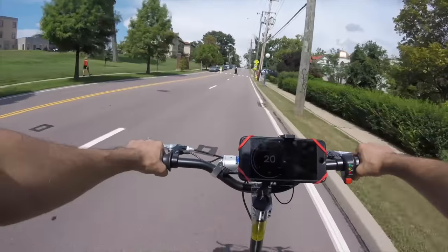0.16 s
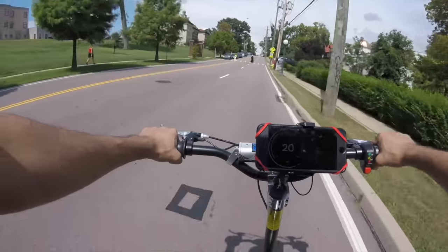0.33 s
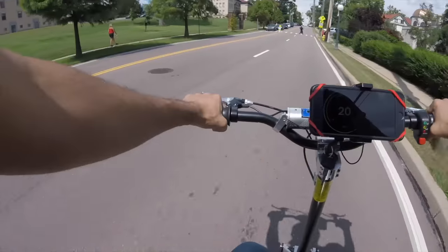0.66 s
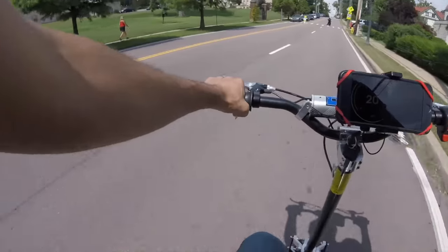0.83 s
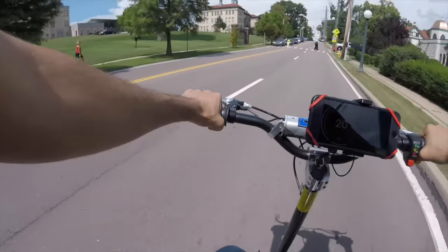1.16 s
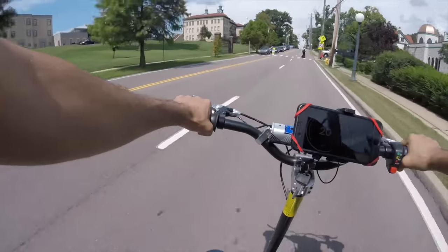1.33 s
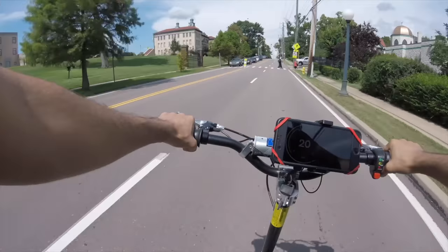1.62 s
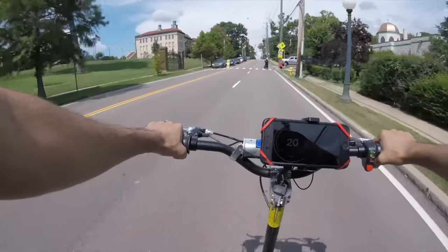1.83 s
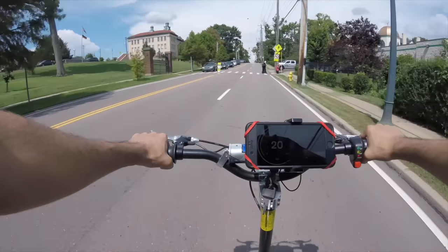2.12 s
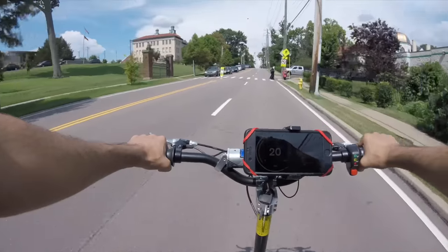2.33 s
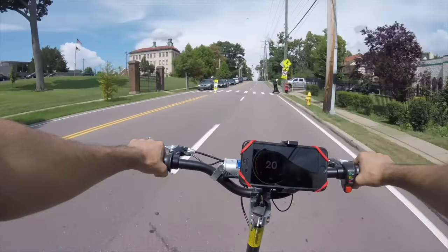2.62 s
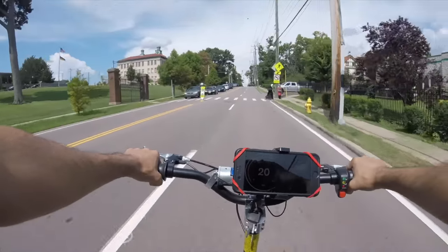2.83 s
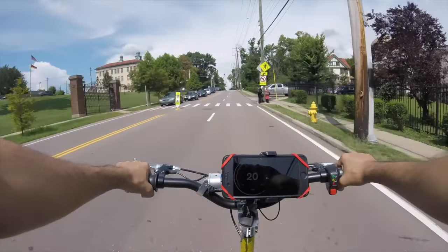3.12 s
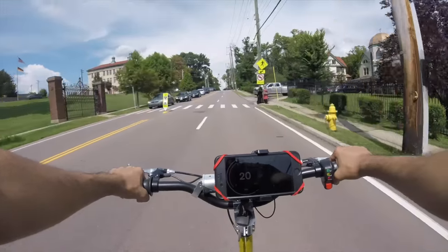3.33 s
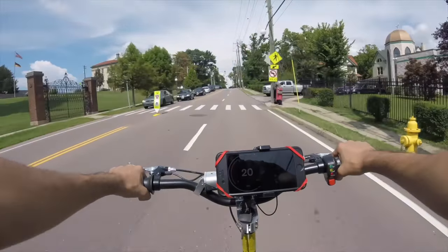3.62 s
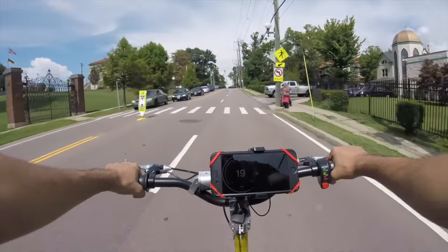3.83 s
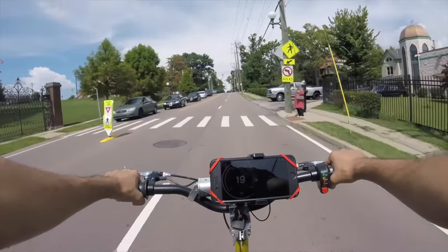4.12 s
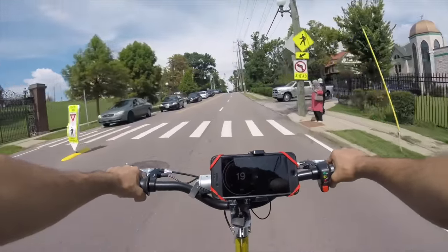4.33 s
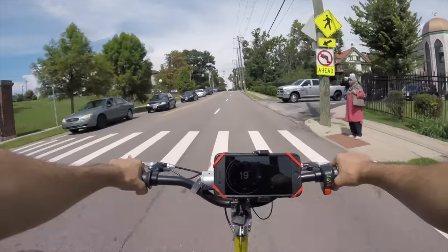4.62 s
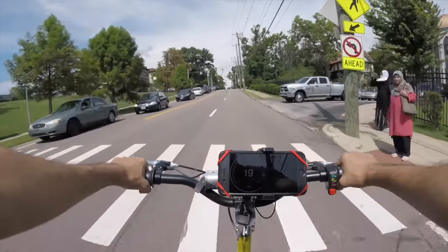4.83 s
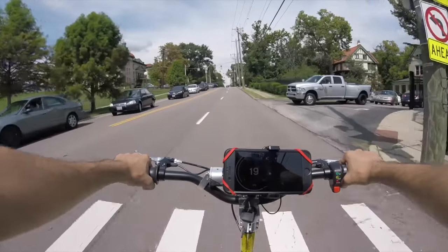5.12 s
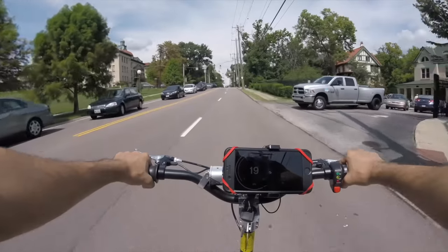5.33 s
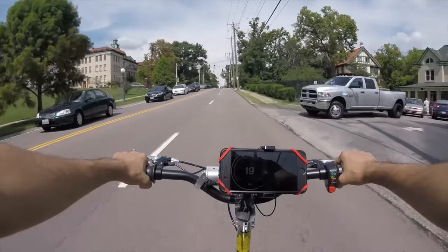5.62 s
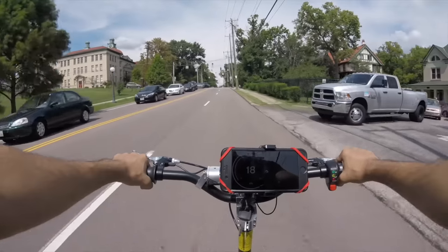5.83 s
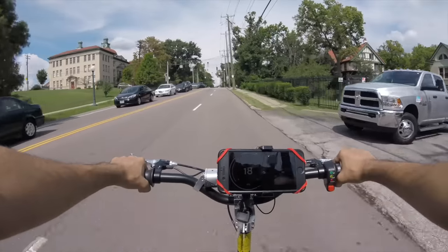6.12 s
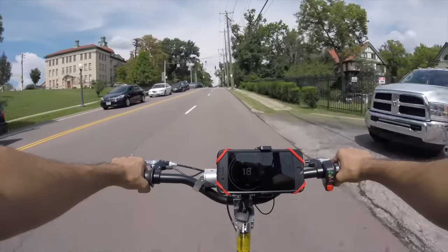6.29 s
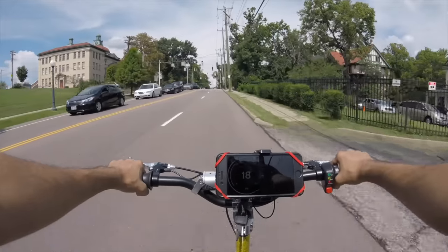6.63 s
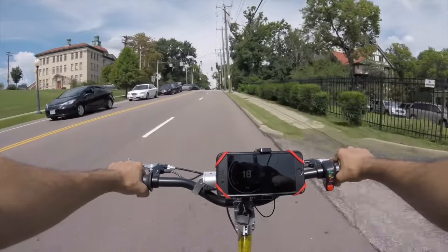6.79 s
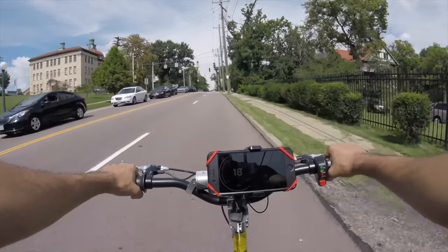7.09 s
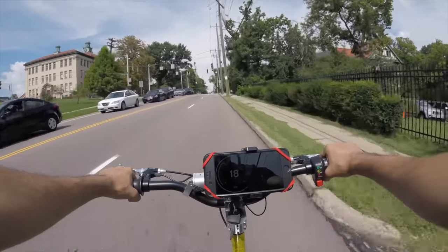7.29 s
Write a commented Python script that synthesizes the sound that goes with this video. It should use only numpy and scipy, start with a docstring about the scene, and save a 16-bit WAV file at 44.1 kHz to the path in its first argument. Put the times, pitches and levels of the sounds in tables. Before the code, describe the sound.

Close on a moving electric scooter: throbbing mid-pitched motor whine, gritty rolling tyres and hiss, with lumpy low wind buffets bursting throughout.

```python
"""On a road, at the chest of the rider: an electric scooter rolls and slowly loses speed.
The hub motor whines 55 times a wheel turn and throbs with the turn, as a sum of sines locked to it.
Tyres roar and hiss as coloured noise through the resonances of the frame; a low hum drifts by itself.
The head wind rumbles on the microphone port and breaks into buffets; a handlebar part squeaks."""
import sys
import numpy as np
from scipy import signal
from scipy.fft import rfft, irfft, next_fast_len
from scipy.io import wavfile
from scipy.ndimage import uniform_filter1d

SR = 44100
rng = np.random.default_rng(int(sys.argv[2]) if len(sys.argv) > 2 else 0)


def invert_db(level):
    """Linear amplitude ratio for a level in decibels (20 dB per decade), elementwise."""
    return 10 ** (np.asarray(level, dtype=float) / 20)


def log_audio(samples):
    """Write samples as a 16-bit WAV file to the path given in sys.argv[1]."""
    # one column per channel
    frames = np.atleast_2d(samples).T
    # limit to full scale, then quantise
    limited = np.clip(frames, -1, 1)
    pcm = np.round(limited * 32767).astype(np.int16)
    wavfile.write(sys.argv[1], SR, pcm)


N = 328646


def rms_one(x):
    """Normalisation: scale a signal to unit root mean square."""
    return x / np.sqrt(np.mean(x ** 2) + 1e-20)


def in_time(rows):
    """Linear interpolation: each column of a time table, sample by sample."""
    s, *columns = np.transpose(rows)
    return [np.interp(np.arange(N) / SR, s, column) for column in columns]


def drift(rate_hz):
    """Low-pass random process: noise at every 40th sample through two equal one-poles; unit rms."""
    pole = np.exp(-2 * np.pi * rate_hz * 40 / SR)
    white = rng.standard_normal(N // 40 + 2002)
    slow = signal.lfilter([1], [1, -2 * pole, pole * pole], white)[2000:]  # settled part only
    return np.interp(np.arange(N) / 40, np.arange(len(slow)), rms_one(slow))


def frame_db(hz):
    """Resonance: bell-shaped lifts in dB, summed over the modes of frame and housing."""
    # modes of frame and housing: (centre [Hz], width [Hz], lift [dB])
    modes = [(1038, 300, 1.5), (1294, 45, -1.5), (1923, 30, 3.5), (2050, 100, 3.5), (2440, 230, 3),
             (2874, 170, 6.5), (3206, 77, 6.5), (3400, 58, 2), (4470, 50, 3.5), (5064, 460, 9.5),
             (6260, 290, 5.5), (6620, 380, 5.5), (9070, 510, 4), (10930, 1500, 11.5), (13000, 600, 6.5)]
    return sum(db / (1 + (2 * (hz - centre) / width) ** 2) for centre, width, db in modes)


def noise(spectrum, patchy_db, flicker_hz, through_frame=False):
    """Spectral shaping: noise in octave bands that flicker together and each alone; unit rms."""
    size = next_fast_len(N)
    hz = np.arange(size // 2 + 1) * SR / size + 1
    points_hz, points_db = np.transpose(spectrum)
    shape_db = np.interp(np.log(hz), np.log(points_hz), points_db, left=-120, right=-120)
    if through_frame:
        shape_db = shape_db + frame_db(hz)
    bins = rfft(rng.standard_normal(size)) * invert_db(shape_db)
    octave = np.floor(np.log2(hz / points_hz[0]))
    together = drift(flicker_hz)
    out = np.zeros(N)
    for k in range(int(np.log2(points_hz[-1] / points_hz[0])) + 1):
        band = irfft(bins * (octave == k), size)[:N]
        out += band * invert_db(patchy_db * (together + drift(flicker_hz)))
    return rms_one(out)


def evened(x, size, floor):
    """Level compression: divide noise by the root of its running power plus a floor; unit rms."""
    return rms_one(x / np.sqrt(uniform_filter1d(x ** 2, size=size) + floor))


def swells(times, levels_db, half_lengths, rise, flat=1):
    """Amplitude envelope: a smooth hump for each event; flat below 1 squares it off."""
    out = np.zeros(N)
    for s, db, half in zip(times, levels_db, half_lengths):
        hump = np.hanning(int(max(half, .004) * 2 * SR)) ** flat
        i = max(int((s - rise * half) * SR), 0)  # rise: share of the half length ahead of the time
        out[i:i + len(hump)] += invert_db(db) * hump[:N - i]
    return out


def motor():
    """Periodic force: magnet pulls whine; an uneven wheel adds other multiples of its turn."""
    # speed of the wheel as pitch of the whine: (time [s], frequency [Hz])
    speed = [(0, 646.8), (0.3, 646.8), (0.5, 648.8), (0.75, 646.2), (1, 640.5), (1.7, 635.8), (2.1, 636.8),
             (2.4, 634.8), (3, 625.5), (3.3, 622.2), (3.6, 621.5), (3.9, 615.2), (4.5, 610.2), (4.8, 603.5),
             (5.4, 603.2), (5.85, 596.2), (6.9, 597), (7.2, 593.5), (7.45, 593.5)]
    # strength of the motor sound: (time [s], whine level [dB])
    whine_levels = [(0, -25.5), (.3, -24.5), (.58, -20.5), (.8, -21.5), (1, -19.5), (1.25, -20.5),
                    (1.7, -20), (2.1, -22), (2.9, -22), (3.25, -22), (3.9, -25), (4.4, -25), (4.9, -27),
                    (5.5, -23.5), (5.9, -28), (6.3, -28), (6.9, -26.5), (7.45, -26.5)]
    # lines of the wheel; neighbours of 55 make the throb, its multiples are overtones: (rate [per turn])
    per_turn = [31.7, 32.6, 50, 53, 54, 56, 57, 60, 65, 70, 75, 82.5, 99, 100, 108, 109, 110, 115, 165, 220,
                255, 270, 275, 330, 385, 440]
    # the lines against the whine, before frame lift and wander:
    # (level when fast [dB], level half slowed [dB], level when slow [dB])
    line_levels = [(-30, -27.5, -17.5), (-18, -18, -20), (-24, -40, -30), (-28, -37, -59), (-50, -43, -14),
                   (-26, -14, -47), (-27, -17, -13), (-23, -27, -23), (-23, -24, -55), (-24, -58, -42),
                   (-20, -23, -52), (-25, -38, -27), (-48, -41, -15), (-40.5, -20, -20), (-52, -23, -20.5),
                   (-22, -42, -31), (-18, -21.5, -15.5), (-35, -38, -21.5), (-24, -22, -28),
                   (-41, -29, -20), (-34, -49, -57), (-40, -52, -55), (-34, -37, -42), (-34, -53, -31),
                   (-32, -40, -43), (-43, -38.5, -44)]
    pulls_per_turn = 55
    fast_hz, slow_hz = 650, 595
    frame_share = 1.23  # a line gets the frame's lift in dB times this
    overtone_wander_db, side_wander_db = 1.2, 3.0

    (hz,), (whine_db,) = in_time(speed), in_time(whine_levels)
    slowed = np.clip((fast_hz - hz) / (fast_hz - slow_hz), 0, 1)
    turn = 2 * np.pi * np.cumsum(hz + 1.34 * drift(35.0)) / SR / pulls_per_turn  # wheel angle [rad]
    out = invert_db(1.4 * drift(38.0)) * np.sin(pulls_per_turn * turn)
    for times, levels_db in zip(per_turn, line_levels):
        # a line swells or fades as the falling speed carries it across the frame resonances
        lift_db = frame_share * frame_db(times / pulls_per_turn * hz[::64])
        wander_db = side_wander_db if times % pulls_per_turn else overtone_wander_db
        level_db = np.interp(slowed[::64], [0, .5, 1], levels_db)
        level_db = level_db + lift_db + wander_db * drift(8.9)[::64]
        # road shake makes each line waver in phase, the higher the more
        waver = (.001 + (times / 11000) ** 2) * times * drift(25.0)
        out += invert_db(level_db).repeat(64)[:N] * np.sin(times * turn + waver)
    return np.sqrt(2) * invert_db(whine_db) * out, turn, slowed


def tyres(turn, slowed):
    """Forced vibration: road grain shakes tyre and frame into noise that beats a little with the turn."""
    # unevenness of the road, before each layer's weight:
    # (time [s], grain for roar and hiss [dB], middle band for drone and buzz [dB], ringing band [dB])
    road = [(0, -1, -2.5, 3), (.3, 0.5, -0.5, 2), (.6, 1, 2, 2), (.85, 2.5, 4.5, 4), (1.25, 1, 5.5, 6),
            (1.7, 2.5, 2, 2.5), (2.1, 2.5, 2, 7), (2.5, -0.5, 0.5, 3), (2.9, 2, 0.5, 8.5),
            (3.25, 2.5, 1, 3), (3.9, 1.4, -0.5, -1.5), (4.4, 0.5, 0, -4), (4.8, 1.5, 0, 0),
            (5.1, 2.7, 2, 6), (5.5, 4.5, 5.5, 7), (5.9, 0.8, 1.5, 3), (6.3, .5, 3.5, 1), (6.9, 3, 4.5, -3),
            (7.45, 2, 3.5, -2)]
    # relative spectra before the frame: (frequency [Hz], level [dB per Hz])
    roar_spectrum = [(150, -4), (250, -6), (500, -4.5), (900, -3.5), (1350, -7.5), (1600, -18.5),
                     (2000, -34)]
    drone_spectrum = [(1200, -16.5), (1500, 1), (2100, 2.5), (2500, -5), (3000, -16)]
    buzz_spectrum = [(2000, -38), (2600, -6.5), (3100, 2.5), (4000, -2), (4600, -3), (5100, -19)]
    ring_spectrum = [(4300, -34), (4800, 3), (5300, -1), (5800, -10)]
    hiss_spectrum = [(4500, -12.5), (5700, -5), (7000, -3.5), (7800, -7.5), (10000, -13), (11800, -19.5),
                     (13500, -21), (15000, -29)]

    grain_db, middle_db, ringing_db = in_time(road)
    # from fast to slow the roar grows, buzz and hiss fade
    roar_db = -31.5 + 0.97 * slowed + grain_db
    drone_db = -43 + middle_db
    buzz_db = -44 - 6.5 * slowed + 1.22 * middle_db
    ring_db = -52 + ringing_db
    hiss_db = -50 - 1.1 * slowed + 0.97 * grain_db + 0.45 * middle_db

    roar = invert_db(roar_db) * noise(roar_spectrum, patchy_db=0.7, flicker_hz=14.0, through_frame=True)
    drone = invert_db(drone_db) * noise(drone_spectrum, patchy_db=1.15, flicker_hz=75.0, through_frame=True)
    buzz = invert_db(buzz_db) * noise(buzz_spectrum, patchy_db=1.05, flicker_hz=30.0, through_frame=True)
    ring = invert_db(ring_db) * noise(ring_spectrum, patchy_db=1.5, flicker_hz=15.0, through_frame=True)
    hiss = invert_db(hiss_db) * noise(hiss_spectrum, patchy_db=0.82, flicker_hz=33.0, through_frame=True)
    beat_db = 0.22 * np.cos(2 * turn)  # twice a turn
    return invert_db(beat_db) * (roar + drone + buzz + ring + hiss)


def hum():
    """Frequency modulation: a low sine whose pitch and level waver slightly."""
    # drift of the tone: (time [s], frequency [Hz], level [dB])
    tone = [(0, 257.4, -41.5), (.6, 260.5, -33), (1.2, 261.4, -37.5), (2.2, 249.8, -41.5), (3, 250, -37.5),
            (3.8, 253.5, -70), (5, 256.7, -43), (5.6, 265.6, -42), (6.3, 269.5, -38), (7, 266, -34.5),
            (7.45, 262, -31.5)]
    hz, level_db = in_time(tone)
    phase = 2 * np.pi * np.cumsum(hz + 4.21 * drift(7.8)) / SR
    return np.sqrt(2) * invert_db(level_db + 1.76 * drift(13.5)) * np.sin(phase)


def wind():
    """Turbulence: lumpy rumble all along; each buffet is a short eddy, a thump with a bright edge."""
    # head wind between surges: (time [s], rumble level [dB])
    steady = [(0, -20.5), (.3, -20), (.7, -15), (1.25, -14.5), (1.4, -21.5), (2.2, -16.5), (2.6, -20.5),
              (3.1, -17), (3.4, -29), (4.5, -22), (4.9, -20), (5.5, -14.5), (5.7, -25.5), (6.4, -15.5),
              (6.6, -23.5), (7.15, -16), (7.45, -24)]
    # low surges of the head wind: (time [s], level [dB], half length [s])
    surges = [(0.122, -15.5, 0.073), (0.614, -20, 0.14), (0.876, -21, .05), (1.27, -19, 0.036),
              (1.475, -20, 0.14), (1.735, -10.5, .06), (1.945, -19, .1), (2.092, -14.5, 0.036),
              (2.25, -15.5, .09), (2.485, -15, 0.068), (2.91, -27, .14), (3.45, -16.5, .1),
              (3.609, -8.5, 0.05), (3.764, -14.5, 0.13), (3.917, -12.5, 0.064), (4.06, -15.5, .07),
              (4.262, -14.5, .1), (4.4, -9.5, 0.03), (4.491, -12.5, 0.035), (4.595, -12, 0.032),
              (4.795, -31, 0.099), (5.054, -20, 0.061), (5.553, -19, .08), (5.68, -11, 0.033),
              (5.798, -18.5, 0.11), (5.96, -13.5, 0.063), (6.113, -17, 0.085), (6.497, -31, 0.045),
              (6.72, -17.5, 0.12), (6.85, -21, .04), (6.937, -16, .045), (7.24, -20.5, 0.1),
              (7.393, -10.5, .065)]
    # buffets on the port, before the trims of level and length below:
    # (time [s], level [dB], bright edge against it [dB], half length [s])
    buffets = [(0.137, -9.5, -9.5, 0.023), (0.613, -11, -23, 0.015), (1.108, -9.5, -24, 0.0085),
               (1.216, -11.5, -13, 0.013), (1.288, -3.5, -13.5, 0.015), (1.721, -11, -0.5, 0.028),
               (1.772, -21, -6, 0.012), (1.934, -20, -17, 0.016), (2.196, -9.5, -22, 0.019),
               (2.272, -13, -9, 0.013), (2.368, -15, -30, 0.03), (2.422, -8.5, -14, 0.015),
               (2.524, -3.5, -25, 0.0076), (2.942, -11.5, -15, 0.03), (3.168, -12, -1, 0.02),
               (3.186, -17, -13, 0.012), (3.276, -7.5, -5.5, 0.018), (3.438, -12.5, -17, 0.017),
               (3.497, -15, 1, 0.014), (3.515, -5.5, -8, 0.018), (3.599, -6.5, -5, 0.014),
               (3.74, -17, -15, 0.017), (3.804, -12.5, -17, 0.008), (3.933, -20, -20, 0.014),
               (4.073, -14, -6, 0.018), (4.208, -30, -18, 0.028), (4.3, -30, -26, 0.0094),
               (4.394, -11.5, -8, 0.022), (4.594, -10, -9, 0.027), (4.829, -9.5, -9, 0.012),
               (5.455, -11.5, -12, 0.016), (5.559, -10.5, -7, 0.017), (5.597, -5.5, -12, 0.014),
               (5.675, -9.5, -15, 0.018), (5.938, -15, -25, 0.029), (5.97, -17.5, -3.5, 0.016),
               (6.167, -14.5, -20, 0.027), (6.365, -9.5, -20, 0.017), (6.495, -6, -10.5, 0.032),
               (6.568, -10.5, -20, 0.01), (6.735, -17, -16, 0.014), (6.952, -14, -24, 0.018),
               (7.258, -6.5, -11, 0.017), (7.392, -4, -14, 0.0074)]
    # relative spectra: (frequency [Hz], level [dB per Hz])
    rumble_spectrum = [(8, -5.5), (20, -2.5), (45, -1), (70, -7.5), (110, -10.5), (180, -21.5),
                       (300, -29.5), (600, -49)]
    thump_spectrum = [(25, -12), (60, 4), (120, -1.5), (200, -5), (350, -15), (600, -30.5), (1000, -56)]
    edge_spectrum = [(150, -13), (300, 1.5), (500, 1), (900, -9.5), (1500, -27), (2400, -44)]

    rumble = evened(noise(rumble_spectrum, patchy_db=1.5, flicker_hz=11.0), size=2500, floor=1.0)
    thump = evened(noise(thump_spectrum, patchy_db=0.74, flicker_hz=23.0), size=900, floor=0.038)
    edge = evened(noise(edge_spectrum, patchy_db=5.0, flicker_hz=96.0), size=400, floor=0.036)

    s, level_db, edge_db, half_length = np.transpose(buffets)
    thumps = swells(s, level_db + 0.32, half_length, rise=0.97) * thump
    bright = swells(s, level_db + edge_db, 0.73 * half_length, rise=0.99) * edge
    strength = invert_db(in_time(steady)[0]) + swells(*np.transpose(surges), rise=0.98)
    flow = strength * rumble + thumps
    # pressure grows with the square of the air speed: crests are sharper than troughs
    high_pass = signal.butter(2, 25, "high", fs=SR, output="sos")
    crests = signal.sosfilt(high_pass, flow ** 2)
    return flow + 0.3 * crests + bright


def ducking():
    """Exponential recovery: a gain that drops quickly at each listed time and creeps back."""
    # dips of motor and tyres: (time [s], gain change [dB])
    dips = np.array([(1.29, -2.5), (1.725, -2), (3.28, -2), (3.6, -2), (5.59, -2.5)])
    fall_s, recover_s = 0.005, 1.01
    since = np.maximum(np.arange(N) / SR - dips[:, :1], 0)
    shape = np.minimum(since / fall_s, 1) * np.exp(-since / recover_s)
    return invert_db(dips[:, 1] @ shape)


def squeaks():
    """Friction: short rubs of a handlebar part, noise in a narrow band with a scratchy halo around it."""
    # rubs: (time [s], level of band and of halo [dB], frequency [Hz], length before scaling [s])
    rubs = [(3.49, -45, 3600, .012), (3.54, -46, 3400, .012), (4.085, -50, 3520, .09)]
    white = rng.standard_normal(N)

    def band(hz, half_width_hz):
        """Band-pass filtering: noise on both sides of a centre frequency, at unit rms."""
        limits = [hz - half_width_hz, hz + half_width_hz]
        return rms_one(signal.sosfilt(signal.butter(2, limits, "band", fs=SR, output="sos"), white))

    out = np.zeros(N)
    for s, db, hz, length in rubs:
        envelope = swells([s], [db], [0.66 * length], rise=0.18, flat=0.2)
        out += envelope * (band(hz, 80) + band(hz, 700))
    return out


def scene():
    """Superposition: motor, tyres, hum, wind and squeaks add at one microphone."""
    whine, turn, slowed = motor()
    rolling = ducking() * (whine + tyres(turn, slowed))
    return (rolling + hum() + wind() + squeaks())[None]


def roll_off(x):
    """The treble ends steeply here."""
    return signal.sosfilt(signal.butter(12, 15100, fs=SR, output="sos"), x)


def record(dry):
    """Soft saturation: the highest peaks are rounded off below a ceiling."""
    ceiling = .97
    mix = dry / (1 + (dry / ceiling) ** 4) ** (1 / 4)
    return roll_off(mix)


dry = scene()
out = record(dry)
log_audio(out)
```